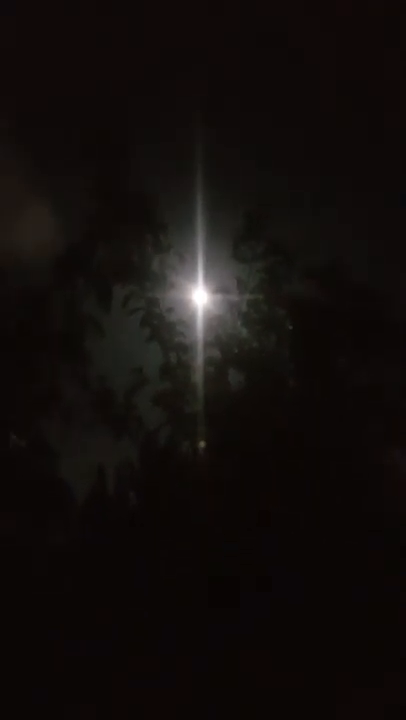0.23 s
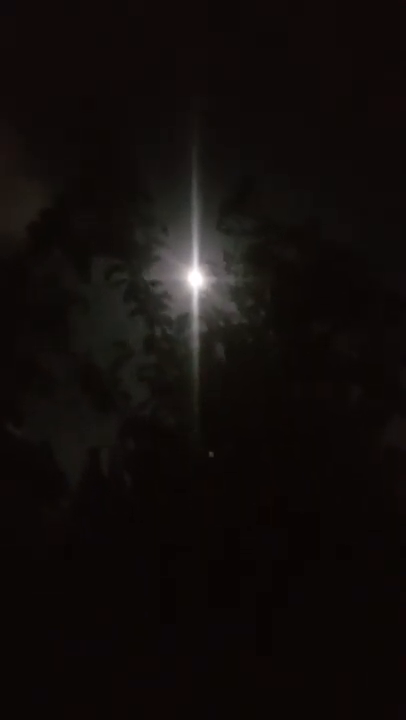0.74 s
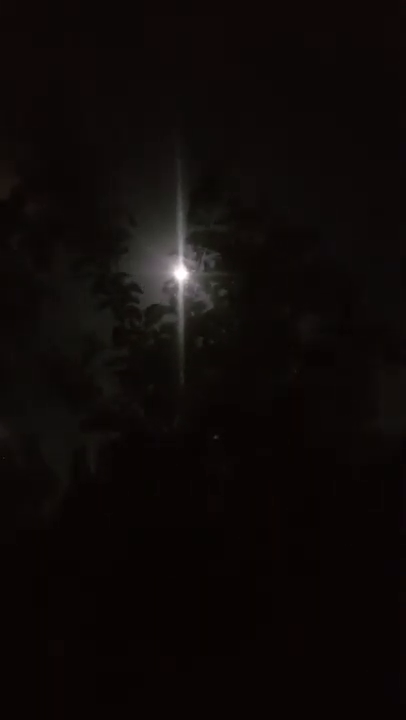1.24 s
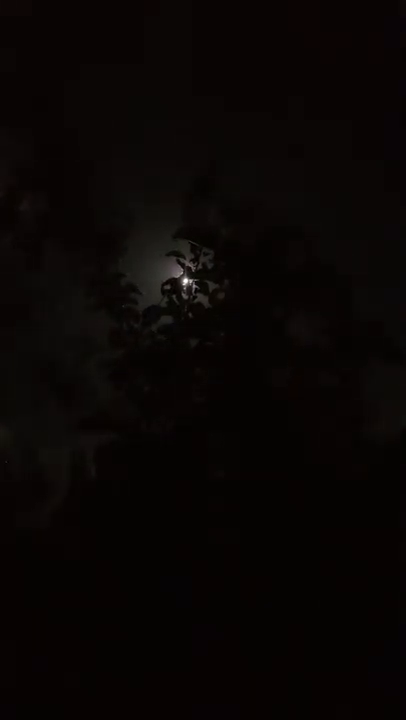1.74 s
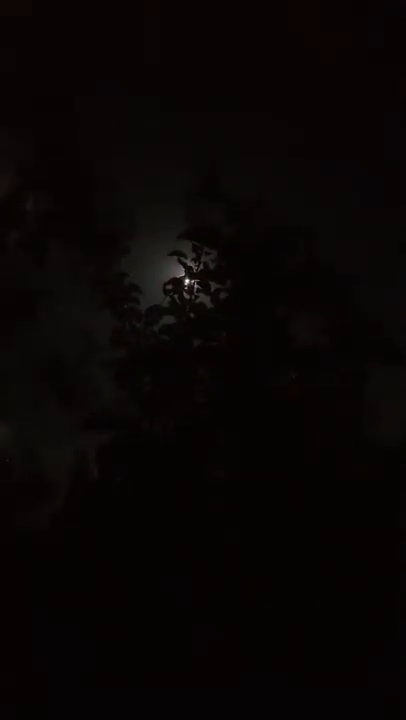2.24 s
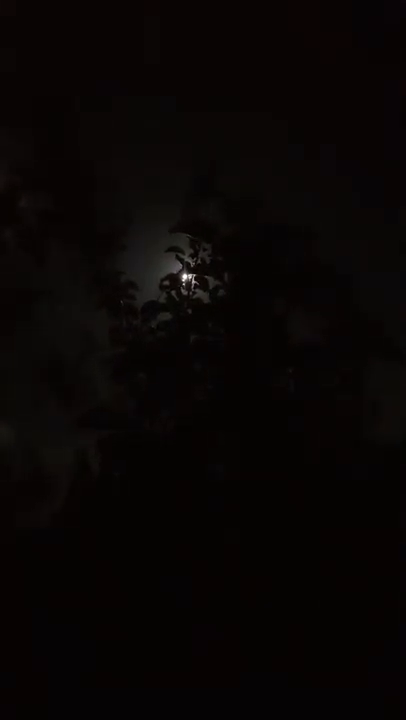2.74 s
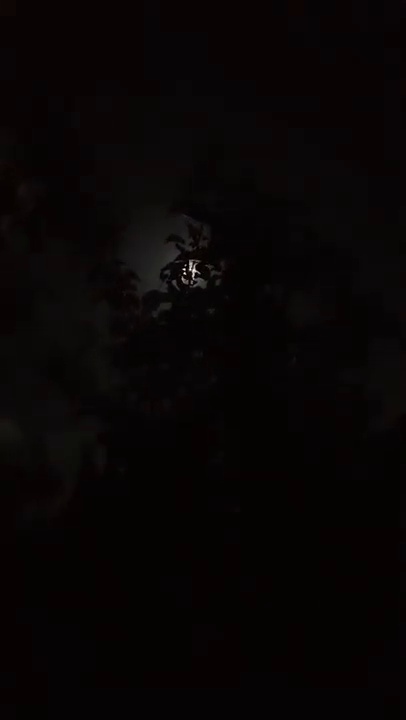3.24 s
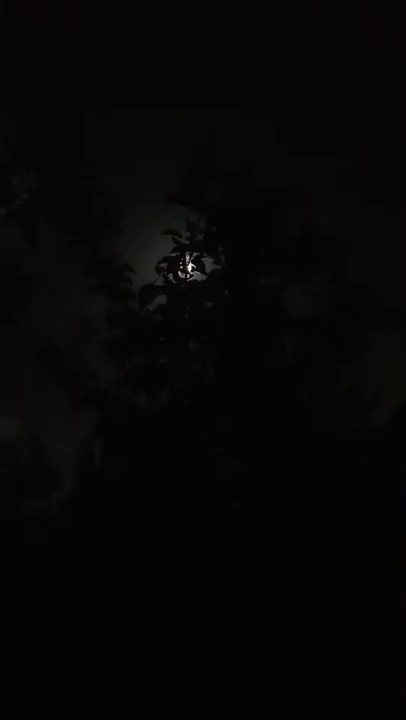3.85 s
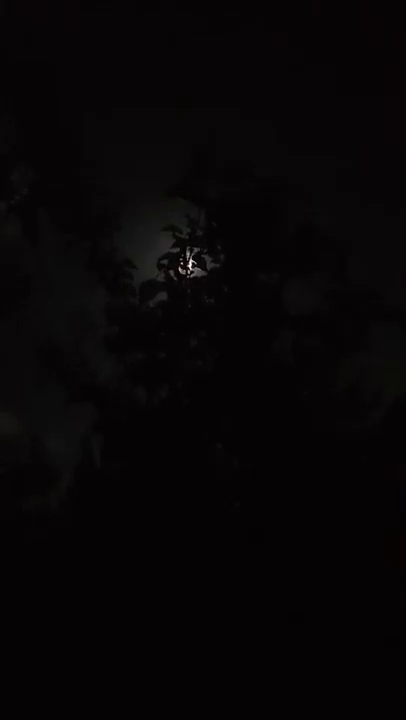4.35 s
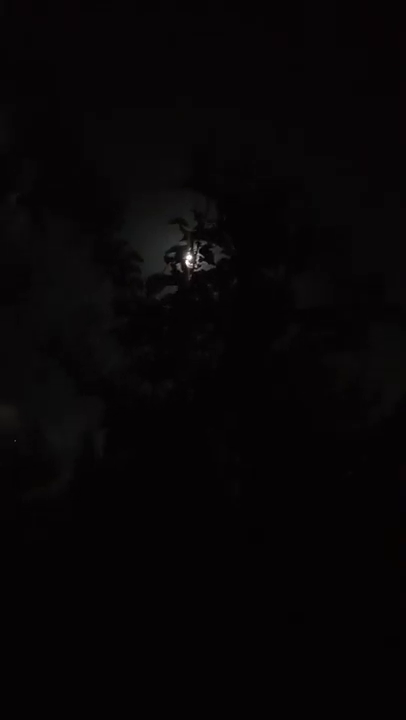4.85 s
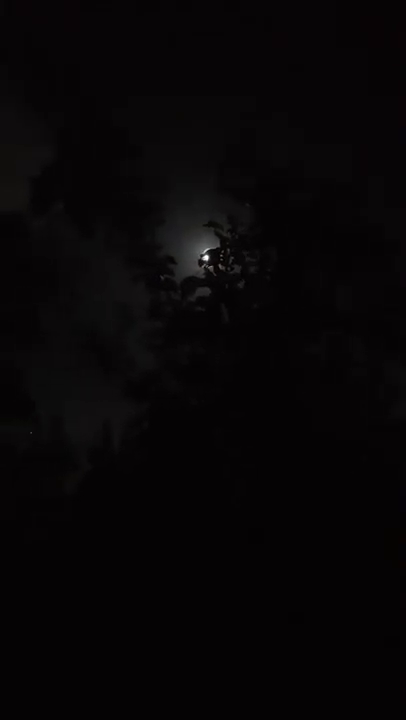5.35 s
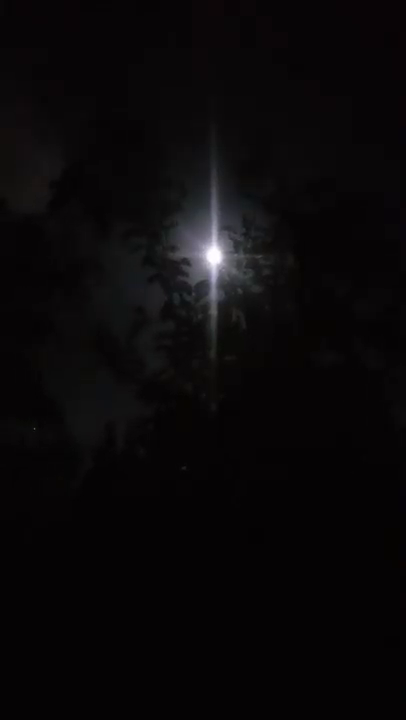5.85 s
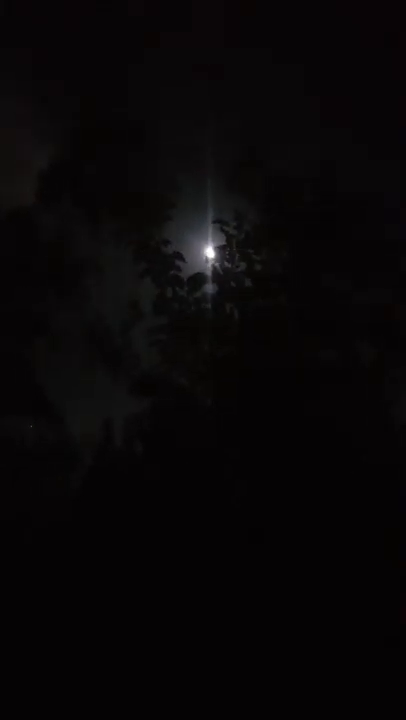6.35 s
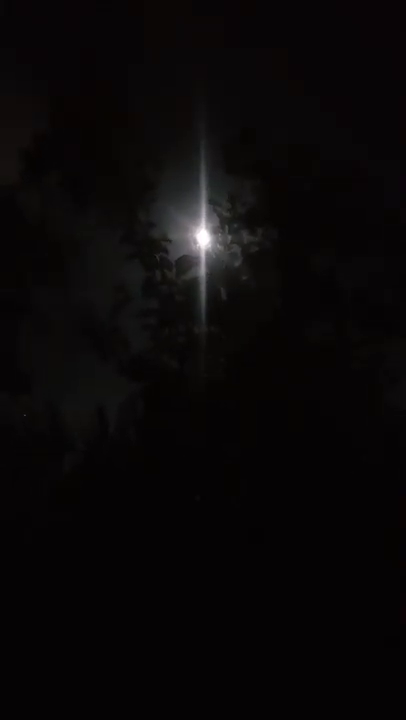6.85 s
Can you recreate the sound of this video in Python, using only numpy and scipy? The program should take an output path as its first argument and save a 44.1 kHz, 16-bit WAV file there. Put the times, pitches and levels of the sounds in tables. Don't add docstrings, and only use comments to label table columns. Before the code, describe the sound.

Outdoors at night, a quiet stream trickles among stones with plops, gurgles and tiny splashes throughout. Soft low wind thumps hit the left microphone first, then fade. From two to four seconds a nightingale sings one phrase: thin high notes, four strong repeated whistles, two falling notes, high fast chips, low swinging notes and a sharp final chuck, echoing briefly in the trees. Afterwards, denser drips and a few faint gusts on the right.

```python
import sys
import numpy as np
from scipy import signal
from scipy.fft import rfft, irfft
from scipy.io import wavfile
from scipy.ndimage import uniform_filter1d

SR = 44100
rng = np.random.default_rng(int(sys.argv[2]) if len(sys.argv) > 2 else 0)


def gain_from_decibels(decibels):
    exponent = np.asarray(decibels, float) / 20
    return 10 ** exponent


def put_to_file(sound):
    columns = np.atleast_2d(sound).T
    safe = np.clip(columns, -1, 1)
    whole_steps = np.round(safe * 32767)
    wavfile.write(sys.argv[1], SR, whole_steps.astype(np.int16))


N = 313551

# time in ms from the start, pitch in Hz, effort in dB.
RISE = [(0, 6450, -18), (10, 6550, -6), (18, 6900, -1), (25, 7330, 0), (32, 7350, -3), (40, 7000, -20)]
SLIDE = [(0, 3900, -18), (6, 3740, -3), (20, 3350, 0), (36, 2900, -1), (43, 2700, -20)]
SCOOP = [(0, 1850, -30), (12, 1740, -25), (30, 2000, -26), (42, 2900, -6), (52, 3250, 0), (68, 3300, -4),
         (76, 3260, -30), (81, 3290, -3), (96, 3280, -10)]
HOOK = [(0, 4380, -28), (15, 4550, -7), (27, 4980, -4), (35, 5120, -9), (38, 4450, -24), (45, 4180, -4),
        (60, 3830, 0), (77, 3680, -4), (83, 3660, -25)]
FALL = [(0, 3500, -11), (3, 2950, -4), (10, 2720, -3), (18, 2670, -5), (42, 2710, -1), (52, 2500, -7),
        (64, 2120, -9), (72, 1800, -15), (77, 1680, -32)]
CHIP = [(0, 6000, -14), (4, 5750, 0), (11, 5400, -1), (18, 5150, -5), (22, 5050, -22)]
THIN = [(0, 7250, -14), (4, 7000, 0), (12, 6900, -3), (18, 6870, -8), (22, 6850, -22)]
HELD = [(0, 7400, -19), (5, 7680, -2), (22, 7680, -8), (38, 7620, -6), (44, 7600, -29)]
DIVE = [(0, 7300, -17), (5, 7180, 0), (16, 7000, -2), (26, 6600, -4), (34, 6200, -5), (42, 6050, -9),
        (46, 6000, -30)]
SWING = [(0, 2300, -14), (2, 1900, -1), (7, 1560, -4), (12, 1420, -12), (18, 1400, -28), (26, 1750, -10),
         (33, 2040, -2), (41, 2220, 0), (52, 2260, -22)]
CHUCK = [(0, 2900, -20), (3, 3900, -6), (6, 4450, -5), (10, 4200, 2), (13, 3600, -7), (19, 2500, -17),
         (27, 2050, -24), (40, 1800, -21), (52, 1580, -29)]
OVERTONE = [(0, 5200, -9), (4, 4950, -2), (14, 4400, 0), (24, 3900, -3), (34, 3400, -22)]
ARCH = [(0, 6650, -16), (8, 6950, -5), (16, 7450, 0), (22, 7480, -2), (30, 7100, -7), (36, 6800, -18)]

# second harmonic in dB, third harmonic in dB, rasp in radians of phase shake.
SHARP, ROUND = (-20, -68, 0.12), (-35.5, -35.5, 0.186)
REEDY, FULL = (-32, -29, 0.129), (-35, -51.5, 0.084)
HUSKY, BUZZY = (-27, -54.5, 0.485), (-22, -58, 0.96)
SHRILL, HARSH = (-8.5, -60, 1), (-31, -34, 0.34)
HISSED, SCRAPED = (2.3, -62, 2.67), (-25.5, -33, 1.353)

# resonance in Hz, width in Hz, level in dB.
HOLLOWS = [(332.72, 28.7, 0), (988.9, 65, -0.5), (1470, 182.7, -2), (2435.4, 38.5, 0.5), (3066, 292, -9),
           (4299.4, 309, -1.5), (1699.5, 139, -4)]
# frequency in Hz, left-right difference in dB.
STREAM_SIDE = [(60, 1), (110, -3.5), (200, 0), (380, -0.5), (700, 6), (1290, -5.5), (2380, 1), (4400, -3),
               (8120, 0), (15000, -8)]
# frequency in Hz, level in dB per Hz.
SPRAY = [(1500, -10.5), (3500, -1.5), (6000, 4), (7500, -2.5), (8500, -10.5), (12000, -14.5),
         (15900, -15.5)]


def evened(x):
    return x / np.sqrt(np.mean(x ** 2) + 1e-20)


def read(points, hz):
    f, value = np.transpose(points)
    return np.interp(np.log(hz + 1), np.log(f + 1), value)


def add(mix, s, sound):
    part = mix[..., round(s * SR):][..., :sound.shape[-1]]
    part += sound[..., :part.shape[-1]]


def coloured(x, points, slope=1):
    hz = np.fft.rfftfreq(x.shape[-1], 1 / SR)
    return irfft(rfft(x) * gain_from_decibels(slope * read(points, hz)), x.shape[-1])


def sides(db):
    return gain_from_decibels(np.multiply.outer([.5, -.5], db))


def blowing(gusts, fall_db=-20, bend=1.34, rise_share=.36):
    t = np.arange(N) / SR
    power = 0
    for s, db, fall_s in gusts:
        away = np.maximum(t - s, (s - t) / rise_share) / fall_s
        power = power + gain_from_decibels(db + fall_db * away ** bend) ** 2
    return power


def wind(lumpy_db=1.5, lee_db=-30.5, calm_db=-83.5):
    # peak in seconds, peak level in dB, seconds to fall by 20 dB.
    left_gusts = [(0.03, -59, 0.43), (0.22, -57, 0.29), (.57, -40, 0.2056), (.65, -44.5, 0.1582),
                  (.75, -44, 0.1), (.85, -48, 0.0254), (.92, -41, 0.07), (1.03, -53.5, 0.01),
                  (1.11, -52, 0.1), (1.245, -43.5, 0.0418), (1.3, -51, 0.078), (1.41, -59.5, 0.01),
                  (1.55, -51, 0.0879), (1.61, -46, 0.1255), (1.72, -47, 0.0271)]
    # peak in seconds, peak level in dB, seconds to fall by 20 dB.
    right_gusts = [(1.9, -60, 0.116), (2.69, -64, 0.12), (2.79, -60, 0.114), (3.3, -51, 0.059),
                   (3.48, -55.5, 0.0427), (4.3, -71.5, 0.324), (5.73, -56, 0.054), (6.0, -60, .15),
                   (6.1, -49.5, 0.1), (6.68, -75.5, 0.29), (7.1, -75, 0.28)]
    # frequency in Hz, level in dB per Hz.
    thump = [(15, -36), (35, -6), (60, 5), (90, -4.5), (150, -16), (350, -41), (700, -71.5), (2000, -92)]
    left, right = blowing(left_gusts), blowing(right_gusts)
    lee = gain_from_decibels(lee_db) ** 2
    power = np.array([left + lee * right, right + lee * left]) + gain_from_decibels(calm_db) ** 2 / 2
    lumps = uniform_filter1d(rng.standard_normal((2, N)), size=900)
    lumps = evened(uniform_filter1d(lumps, size=900))
    rumble = evened(coloured(rng.standard_normal((2, N)), thump))
    return 2 * np.sqrt(power) * evened(rumble * gain_from_decibels(lumpy_db * lumps))


def swells(rows, t):
    heights = []
    for s, db, rise, fall in rows:
        away = np.where(t < s, (s - t) / rise, (t - s) / fall)
        heights.append(db * np.clip(1 - away, 0, 1))
    return np.max(heights, axis=0)


def stream(level_db=-60, flow_db=-3.5, patchy_db=2.5, flicker_db=0.65, ring_db=-3.0):
    # frequency in Hz, level in dB per Hz.
    wash = [(40, -38), (110, -5), (180, -7), (650, -12.5), (1150, -21), (2100, -14.5), (3600, -15.5),
            (5500, -15), (7400, -15.5), (8200, -24.5), (15900, -27)]
    # frequency in Hz, likeness from 0 to 1.
    alike = [(60, 0.85), (200, 0.87), (900, 1), (2000, 0.15), (3500, 0.09), (6500, 0.38), (9000, 0),
             (15000, 0)]
    # peak in seconds, dB over the usual flow, rise in seconds, fall in seconds.
    gurgles = [
        (0.001, 11, .05, 0.049),
        (1.09, 8, 0.37, 0.043),
        (1.95, 3, 0.39, 0.185),
        (3.36, 10, 0.196, 0.0693),
        (3.64, 8, 0.168, 0.41),
        (4.83, 5.5, 0.042, 0.62),
        (5.46, 5.5, 0.042, 0.9),
        (6.21, 11.5, 0.1, 0.077),
        (6.6, 10.5, 0.0295, 0.266),
    ]
    frames, hz = N // 128 + 5, np.fft.rfftfreq(512, 1 / SR)
    a, b, c, d, patches = rng.standard_normal((frames, 257, 5)).T
    patches = uniform_filter1d(patches, size=5, axis=0)
    patches = evened(uniform_filter1d(patches, size=12, axis=1))
    flicker = evened(uniform_filter1d(rng.exponential(1, frames) - 1, size=3))
    gurgle_db = flow_db + swells(gurgles, np.arange(frames) * 128 / SR)
    low = (1 / (1 + (hz / 800) ** 4))[:, None]
    rings = sum(gain_from_decibels(db + ring_db) ** 2 / (1 + (2 * (hz - f) / w) ** 4) for f, w, db in HOLLOWS)
    height = np.sqrt(gain_from_decibels(read(wash, hz)) ** 2 + rings)[:, None]
    height = height * gain_from_decibels(patchy_db * patches + flicker_db * flicker * (2 - low) + gurgle_db * low)
    same = np.clip(read(alike, hz), 0, 1)[:, None]
    left, other = a + 1j * b, c + 1j * d
    z = np.array([left, same * left + np.sqrt(1 - same ** 2) * other])
    z *= height * sides(read(STREAM_SIDE, hz))[..., None]
    water = signal.istft(z, nperseg=512, noverlap=384)[1][:, :N]
    return gain_from_decibels(level_db + 2.5) * evened(water)


def bubble(hz, cycles, rise=0.0584):
    u = np.arange(int(3 * cycles * SR / hz)) * hz / SR / cycles
    ring = np.sin(2 * np.pi * cycles * (u + rise * u ** 2 / 2))
    return ring * np.exp(-2 * u) * np.minimum(u / .25, 1) ** 1.5


def drips(per_s=55, small_db=-59.5, spread_db=3, knock_db=-13, after_db=-10, after_s=.07):
    # start in seconds, peak level in dB, bubble pitch in Hz.
    plops = [(0.196, -50, 987), (0.467, -53.5, 1023), (0.708, -49.5, 1357), (0.856, -53.5, 1457),
             (0.908, -49.5, 1508), (0.99, -51, 1023), (1.105, -47.5, 1043), (1.662, -46.5, 3190),
             (1.679, -44, 1470), (1.726, -45, 1742), (1.866, -43, 1580), (1.896, -44, 1695),
             (2.326, -41, 1422), (2.379, -48.5, 1573), (4.21, -47, 1470), (4.341, -52, 866),
             (4.511, -51, 3230), (4.726, -48, 945), (5.13, -36.5, 1390), (5.229, -42, 1504),
             (5.456, -42, 1516), (5.551, -53, 704), (5.799, -46, 1610), (5.818, -51.5, 805),
             (6.056, -48, 958), (6.148, -44.5, 2342), (6.303, -44.5, 1572), (6.384, -42.5, 1849),
             (6.64, -47, 2410), (6.824, -44, 1466)]
    # start in seconds, peak level in dB, bubble pitch in Hz.
    droplets = [(0.078, -52.5, 2410), (0.217, -56, 1550), (0.443, -48, 1390), (0.537, -56, 1750),
                (0.69, -49, 997), (0.954, -53.5, 1740), (1.158, -56, 1550), (1.479, -52, 1740),
                (1.542, -57.5, 1560), (1.574, -56.5, 1480), (1.643, -49.5, 1340), (4.155, -55, 1450),
                (4.195, -53.5, 1495), (4.298, -50.5, 1389), (4.444, -52.5, 1544), (4.905, -50.5, 1490),
                (5.063, -56, 1580), (5.099, -50, 1470), (5.148, -45.5, 990), (5.244, -46, 1360),
                (5.307, -52, 1500), (5.517, -50.5, 881), (5.567, -47, 1460), (5.705, -55.5, 1500),
                (5.759, -56.5, 929), (5.985, -54.5, 2600), (6.131, -47.5, 1593), (6.183, -45.5, 1350),
                (6.424, -49, 2410), (6.508, -48.5, 1620), (6.628, -49.5, 1730), (6.745, -52.5, 1000),
                (6.93, -53.5, 922), (7.014, -52, 1050)]
    out = np.zeros((2, N))
    chance = rng.random((600, 5))
    knock = bubble(HOLLOWS[1][0], cycles=6)
    for (s, db, hz), shed in zip(plops, chance[540:, :3].reshape(30, 2, 3)):
        gain = gain_from_decibels(db + 6.5) * sides(1.58 * read(STREAM_SIDE, hz))[:, None]
        add(out, s - .002, gain * bubble(hz, cycles=7))
        add(out, s - .002, gain * gain_from_decibels(knock_db) * bubble(1.4 * hz, cycles=5))
        add(out, s - .002, gain * gain_from_decibels(knock_db) * knock)
        for wait, detune, size in shed:
            small = bubble(hz * (.62 + .55 * detune), cycles=8)
            add(out, s + .008 + wait * after_s, gain * gain_from_decibels(after_db * (1 + size)) * small)
    for s, db, hz in [*droplets, (1.03, -53, 700), (1.055, -52, 640), (1.07, -54, 760)]:
        gain = gain_from_decibels(db + 4.0) * sides(read(STREAM_SIDE, hz))[:, None]
        add(out, s - .002, gain * bubble(hz, cycles=7))
    for when, which, detune, size, pan in chance[:int(per_s * N / SR)]:
        hz = HOLLOWS[1 + int(which ** 2 * 4)][0] * (.86 + .24 * detune)
        loud = gain_from_decibels(small_db - spread_db * np.log(size + 0.021))
        gain = loud * sides(-2 + 8 * (pan - .5))[:, None]
        add(out, when * N / SR, gain * bubble(hz, cycles=5))
    return out


def splashes(lift_db=-7, ticks_per_s=25, tick_db=-59):
    # start in seconds, peak level in dB, length in ms, left-right difference in dB.
    bursts = [(0.1483, -49.5, 12.1, -7), (0.283, -54, 6.1, -14.5), (0.5372, -51.5, 10.8, -2),
              (1.427, -49.5, 9.5, -2.5), (1.6464, -49.5, 14, -4.5), (1.8148, -53.5, 33, -6),
              (2.1864, -48, 36.7, 2.5), (2.234, -40, 6, 3.5), (2.2415, -47, 23, 2.5),
              (3.4041, -46.5, 8.2, -6.5), (4.1707, -47, 5.3, -1.5), (4.8174, -53, 13.5, -2.5),
              (5.044, -55, 15, -1.5), (4.298, -51, 7, -2), (2.018, -52, 5, -2), (5.78, -52, 7, -2),
              (6.3, -53, 8, -2), (5.354, -51, 7.5, 3), (5.9841, -48.5, 11.2, -2), (6.507, -46.5, 8.7, -1.5)]
    level = np.zeros((2, N))
    ticks = []
    for u, v, w in rng.random((300, 3))[:int(ticks_per_s * N / SR - len(bursts))]:
        ticks.append((u * N / SR, tick_db - 2.6 * np.log(v + 0.0133), 1.96 + 6 * w, -2))
    ticks = ticks[:]
    for s, db, ms, pan_db in [*bursts, *ticks, *more_ticks(len(bursts), tick_db)]:
        fade = np.exp(-np.arange(int(4 * ms * SR / 1000)) / (ms * SR / 1000))
        add(level, s, gain_from_decibels(db + lift_db) * sides(pan_db)[:, None] * fade)
    crackle = rng.standard_normal(N) * rng.exponential(1, N) + 2.0 * rng.standard_normal((2, N))
    return level * evened(coloured(crackle, SPRAY))


def more_ticks(count, tick_db):
    return [(u * N / SR, tick_db - 2.6 * np.log(v + 0.0133), 1.96 + 6 * w, -2)
            for u, v, w in rng.random((count, 3))]


def trees(x, near_db=-4.5, near_t60=0.0526, far_db=-7.0, bounce_db=-3):
    # frequency in Hz, time to fall 60 dB in seconds.
    trunk_t60 = [(1500, 0.484), (4000, 0.477), (8000, 0.278), (15000, 0.285)]
    # frequency in Hz, level in dB.
    scatter = [(1000, -1), (2200, -3), (3500, -4), (5000, 1.5), (7000, 5), (14000, 8.5)]
    # port (0 left, 1 right), delay in ms, level in dB.
    bounces = [
        (0, 1.8, -11),
        (0, 5.7, -4),
        (0, 8.8, -11),
        (0, 23, -14),
        (1, 2.2, -8),
        (1, 9.6, -6),
        (1, 11.4, -11),
        (1, 21, -11),
    ]
    taps = np.zeros((2, SR))
    at = np.arange(40, SR - 20, 20) + rng.integers(0, 20, (2, (SR - 41) // 20))
    np.put_along_axis(taps, at, rng.choice([-1., 1.], at.shape), 1)
    near = taps * gain_from_decibels(-60 * np.arange(SR) / SR / near_t60)
    hz, t, z = signal.stft(taps[::-1, ::-1], SR, nperseg=256)
    decay = gain_from_decibels(-60 * t / read(trunk_t60, hz)[:, None])
    far = signal.istft(z * decay, SR, nperseg=256)[1][:, :SR]
    path = gain_from_decibels(near_db) * near / np.linalg.norm(near[0]) + gain_from_decibels(far_db) * far / np.linalg.norm(far[0])
    path = coloured(path, scatter)
    path[:, 0] += 1
    for port, ms, db in bounces:
        path[port, round(ms * SR / 1000)] -= gain_from_decibels(db + bounce_db)
    return signal.fftconvolve(x, path, axes=1)[:, :N]


def syllable(shape, quality, db, factor, breath_db=-24):
    second_db, third_db, rasp = quality
    ms, hz, effort_db = np.transpose(shape)
    t = np.arange(0, ms[-1], 1000 / SR)
    pitch = uniform_filter1d(np.interp(t, ms, hz * factor), size=60, mode="nearest")
    shake, air = rng.standard_normal((2, 6000))
    shake = evened(uniform_filter1d(uniform_filter1d(shake, size=70), size=70))
    turn = 2 * np.pi * np.cumsum(pitch) / SR + rasp * shake[:len(t)]
    tone = np.sin(turn) + gain_from_decibels(second_db) * np.sin(2 * turn)
    tone += gain_from_decibels(third_db) * np.sin(3 * turn) * (3 * pitch < SR / 2)
    breath = evened(coloured(air, SPRAY, 0.29))[:len(t)]
    tone += (rasp ** 2 + 0.175) * gain_from_decibels(breath_db) * breath
    effort = np.sqrt(2) * gain_from_decibels(db + np.interp(t, ms, effort_db))
    return effort * tone * signal.windows.tukey(len(t), .08)


def nightingale():
    # start in seconds, syllable shape, voice quality, level in dB, pitch factor.
    song = [(2.005, ARCH, ROUND, -51, 0.993), (2.04, RISE, SHARP, -40.5, 0.992),
            (2.079, RISE, SHARP, -40.5, 0.9736), (2.396, SLIDE, ROUND, -44.5, 1.013),
            (2.395, SLIDE, HUSKY, -53, 0.787), (2.44, SCOOP, ROUND, -33.5, 1.0024),
            (2.584, HOOK, REEDY, -27.5, 1.0023), (2.726, HOOK, REEDY, -26, 0.998),
            (2.864, HOOK, REEDY, -25.5, 1.006), (3.008, HOOK, REEDY, -25.5, 0.9886),
            (3.154, FALL, FULL, -26, 1.01), (3.292, FALL, FULL, -27.5, 0.984),
            (3.464, CHIP, BUZZY, -41, 1.022), (3.485, CHIP, BUZZY, -36.5, .98),
            (3.508, CHIP, BUZZY, -36.5, 1.046), (3.465, THIN, SHRILL, -43, 0.993),
            (3.484, DIVE, SHRILL, -43, 1.03), (3.51, HELD, SHRILL, -40, 1.001),
            (3.556, DIVE, HUSKY, -32.5, 1.007), (3.655, SWING, ROUND, -34.5, 1.057),
            (3.742, SWING, ROUND, -35, 0.994), (3.828, SWING, ROUND, -34, 0.976),
            (3.917, SWING, ROUND, -37.5, 0.955), (3.205, HELD, HISSED, -66.5, 0.834),
            (3.341, HELD, HISSED, -67, 0.894), (4.013, CHIP, SCRAPED, -49, .76),
            (4.027, THIN, BUZZY, -39, .6), (4.017, CHUCK, HARSH, -29, 0.993),
            (4.019, HELD, HISSED, -56, 0.824), (4.033, OVERTONE, SCRAPED, -38, 1.001)]
    # frequency in Hz, level in dB.
    sheen = [(1000, 0), (7500, 0), (8500, -6), (10300, -1), (11500, 2), (13000, 0), (14300, -7),
             (15500, -11)]
    # frequency in Hz, left-right difference in dB.
    bird_side = [(1500, 1.5), (2700, -0.5), (4000, 1), (5300, 3.5), (7200, 5), (12000, 5.5)]
    voice = np.zeros(N)
    for s, *note in song:
        add(voice, s, syllable(*note))
    voice = coloured(voice, sheen)
    return trees(np.array([coloured(voice, bird_side, 0.908), coloured(voice, bird_side, -0.39)]))


def scene():
    water = stream() + trees(drips() + splashes(), near_db=-1.5, far_db=-9.5, bounce_db=-14.5)
    water[0] = np.roll(water[0], 13)
    return wind() + water + nightingale()


def top_cut(x):
    return signal.sosfilt(signal.butter(12, 15830, fs=SR, output="sos"), x)


def record(dry, mask_db=-46, depth_db=-35, reach_hz=420, edge_hz=15830):
    hz, _, z = signal.stft(dry, SR, nperseg=1024)
    power = (abs(z[:, (hz > 6300) & (hz < 8000)]) ** 2).sum(1).mean(0)
    power = np.roll(uniform_filter1d(power, size=3), 3)
    over_db = 10 * np.log10(power + 1e-12) - mask_db
    band = ((hz > 8200) & (hz < 11300))[:, None]
    blanked = np.clip((8300.0 + reach_hz * over_db - hz[:, None]) / 300, 0, 1) * band
    z = z * gain_from_decibels(depth_db * blanked) * (hz < edge_hz)[:, None]
    return top_cut(signal.istft(z, SR, nperseg=1024)[1][:, :N])


dry = scene()
out = record(dry)
put_to_file(out)
```